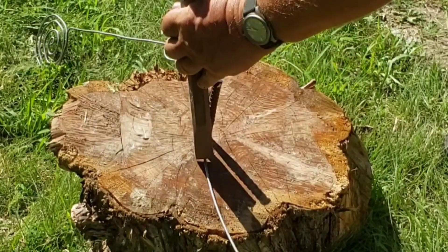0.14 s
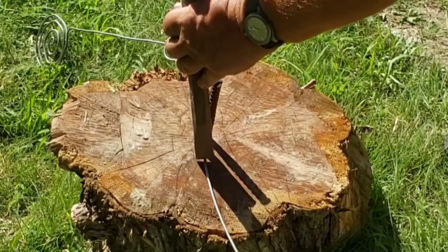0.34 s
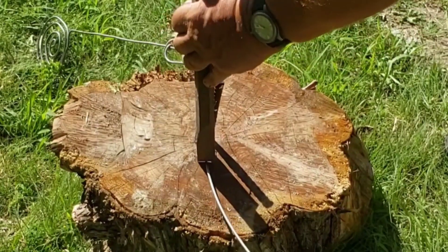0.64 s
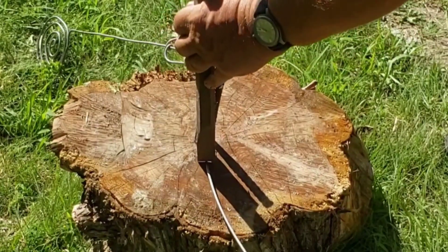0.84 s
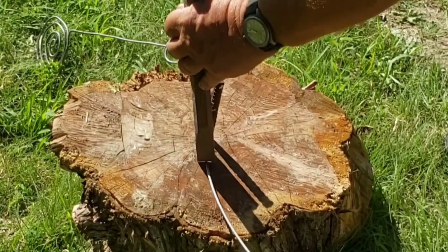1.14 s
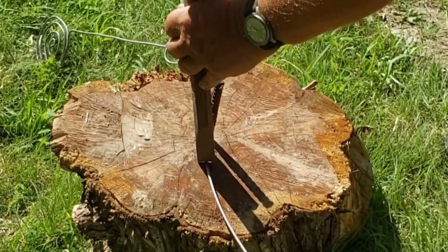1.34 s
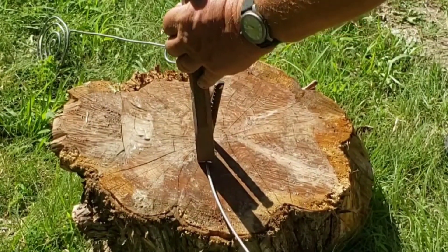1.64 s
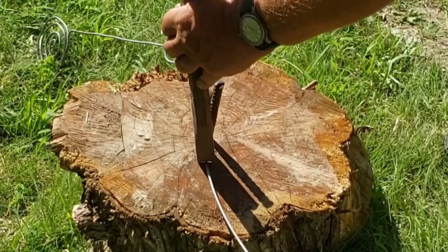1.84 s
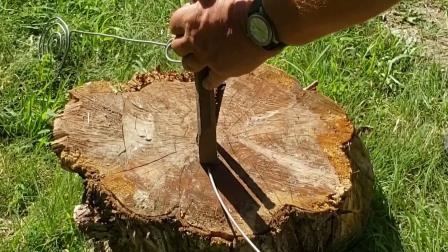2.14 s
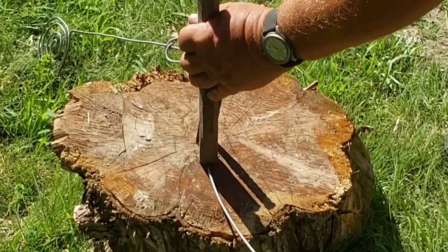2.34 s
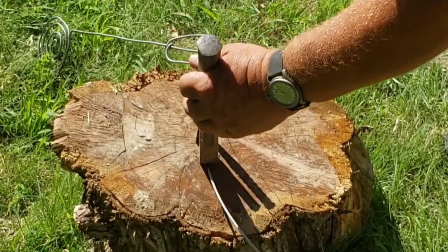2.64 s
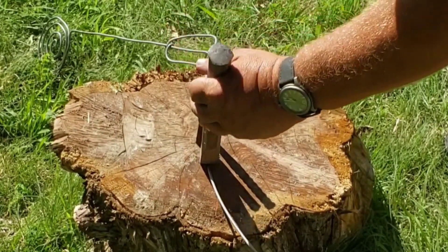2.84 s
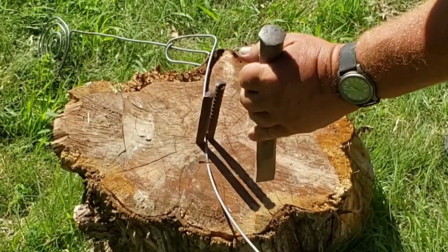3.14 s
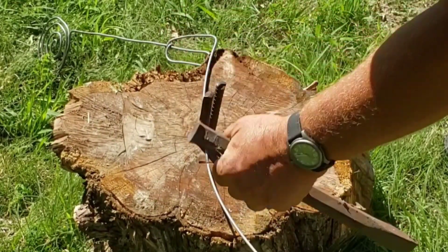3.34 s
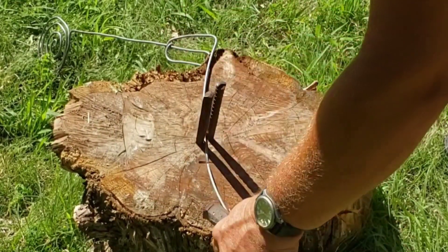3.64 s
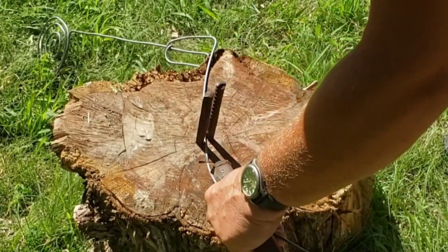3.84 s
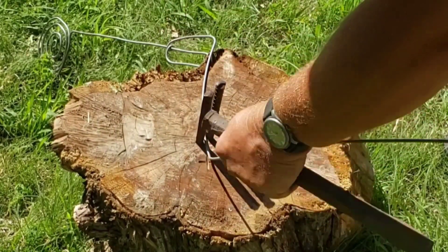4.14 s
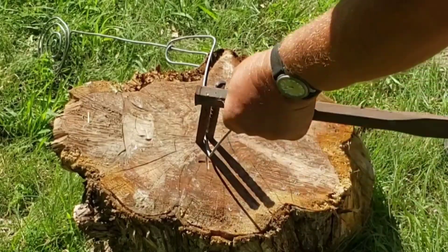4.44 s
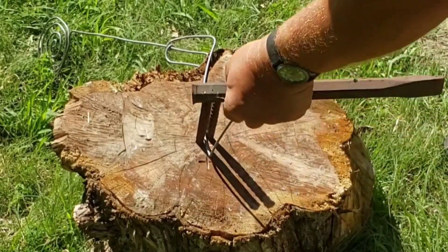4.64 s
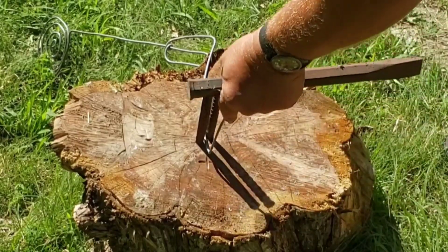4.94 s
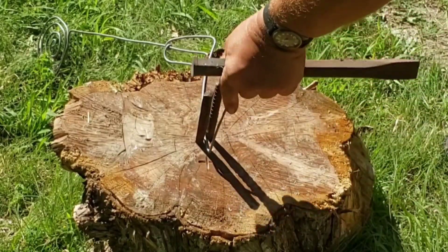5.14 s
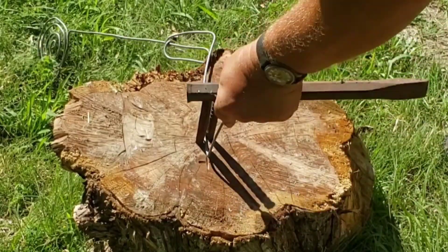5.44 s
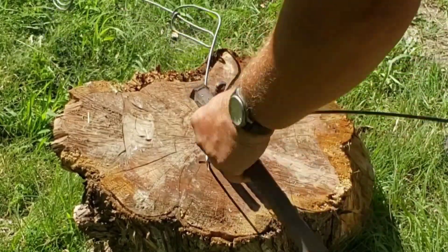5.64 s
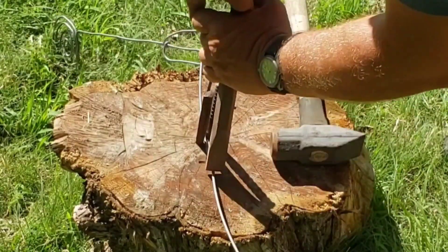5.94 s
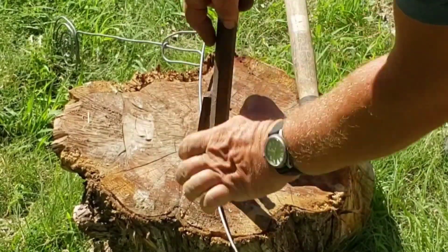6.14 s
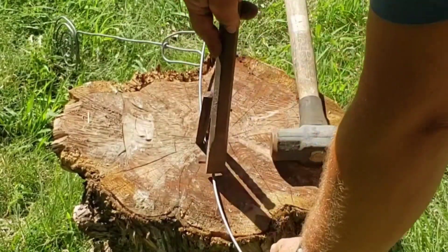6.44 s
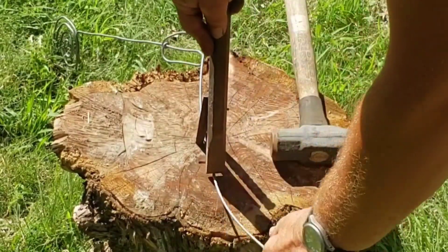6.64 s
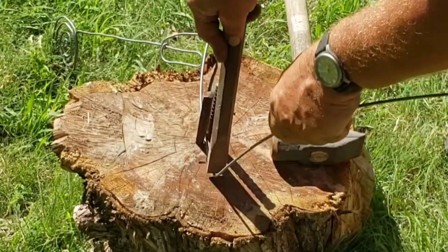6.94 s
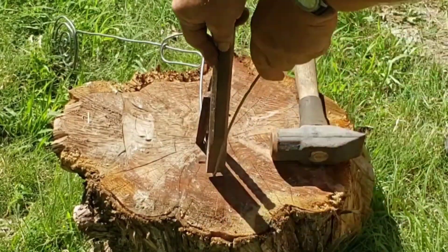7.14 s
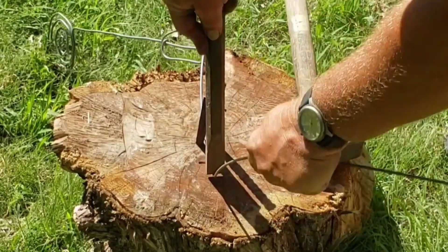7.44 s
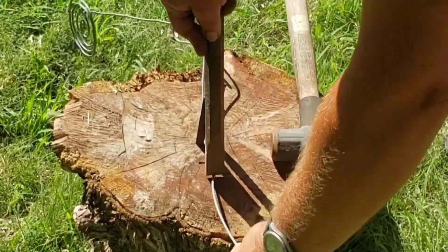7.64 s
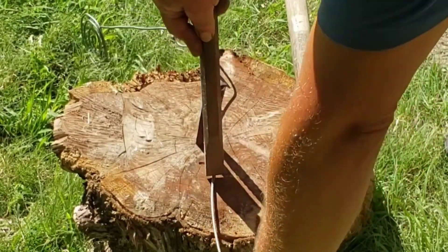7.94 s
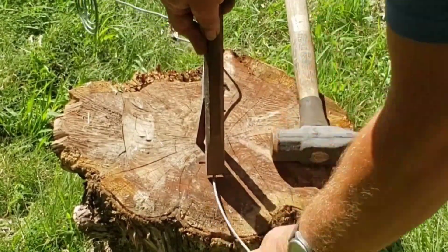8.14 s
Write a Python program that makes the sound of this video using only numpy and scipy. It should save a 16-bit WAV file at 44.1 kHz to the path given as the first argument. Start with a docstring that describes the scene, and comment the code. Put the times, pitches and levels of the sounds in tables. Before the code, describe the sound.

Three hard hammer blows on a cold chisel over a wooden stump, then small metal clinks, wire ticks and rattles, with growing wind buffeting outdoors.

```python
"""Low wind rumble and a faint hiss of leaves come first, then three blows of a hammer on a cold chisel,
cutting steel wire on a tree stump in a garden: noise bursts crack, decaying modes ring and thud.
The chisel is lifted and clinks in the hand; the notched wire is bent to and fro, ticks, and slips with
a rattle, as light contacts, gritty scrapes and short dull thuds. Shaped noise makes the rising breeze in
the leaves and the turbulence at the microphone, where single eddies add quick pressure swings."""
import sys
import numpy as np
from scipy import signal
from scipy.fft import rfft, irfft, next_fast_len
from scipy.io import wavfile
from scipy.ndimage import uniform_filter1d

SR = 44100
rng = np.random.default_rng(int(sys.argv[2]) if len(sys.argv) > 2 else 0)


def store_pcm(level_fs):
    """Save levels as 16-bit WAV."""
    pcm = np.round(np.clip(level_fs, -1, 1) * 32767).astype(np.int16)
    wavfile.write(sys.argv[1], SR, np.atleast_2d(pcm).T)


N = 365588
TIME = np.arange(N) / SR

# In every spectrum the levels are relative: the noise made from it is scaled to rms 1.
# wind on the microphone, before its chance lumps: time_s, level_db
WIND = [(0.0, -47), (0.64, -37.5), (1.06, -48), (1.6, -47.5), (2.1, -36.5), (2.28, -50.2), (2.68, -45.5),
        (2.92, -33), (3.2, -47), (3.8, -47.5), (4.08, -38.5), (4.21, -49.5), (4.45, -32.5), (5.74, -45),
        (5.8, -26.5), (6.73, -29.5), (8.23, -31.5), (8.29, -45.5)]
# buffets, single strong eddies: centre_s, pitch_hz, swing_db, wake_db
BUFFETS = [(0.332, 76, -29, -32.5), (0.77, 101, -25.5, -35), (2.204, 100, -27, -37),
           (2.377, 71.4, -28.5, -34.5), (4.515, 75, -18.5, -44), (5.008, 60.6, -20, -33),
           (5.22, 54.7, -17, -38), (5.796, 113, -13.5, -25.5), (5.875, 92, -11, -39),
           (6.018, 167, -22, -50), (6.142, 65, -18.5, -26.5), (6.751, 93, -4.5, -27.5),
           (6.841, 109, -21, -23.5), (7.251, 87.4, -16, -28), (7.44, 167, -9.5, -24.5),
           (7.532, 91, -15.5, -26), (7.652, 149, -15.5, -19.5), (7.719, 76, -14, -19),
           (8.016, 87, -10.5, -21.5), (8.15, 80, -8.5, -24)]
# spectrum of moving air at the microphone: frequency_hz, density_db_per_hz
RUMBLE = [(12, -37), (22, -14.5), (48, 7.5), (80, 4), (135, -9), (220, -30.5), (400, -51), (800, -91.5)]
# spectrum of small eddies at the microphone: frequency_hz, density_db_per_hz
FLUTTER = [(60, -24.5), (130, 7.5), (200, -1), (300, -11.5), (450, -22.5), (900, -61.5), (3000, -110)]
# breeze in the leaves: time_s, level_db
BREEZE = [(0.0, -61.5), (0.6, -57.5), (0.92, -64), (2.03, -60), (2.38, -64), (4.41, -57), (4.62, -53.5),
          (5.06, -50.5), (6.12, -53), (7.32, -51.5), (7.69, -49), (8.29, -49.5)]
# spectrum of the dull body of the leaves: frequency_hz, density_db_per_hz
LEAVES_BODY = [(120, -6.5), (300, 3), (550, 1), (1000, -2.5), (1500, -3.5), (2200, -12), (3200, -20),
               (6000, -53)]
# spectrum of the hiss of the leaves: frequency_hz, density_db_per_hz
LEAVES_HISS = [(1200, -23.5), (2200, -1), (3200, 0), (4500, -6), (7000, -10), (9500, -15.5), (11500, -29),
               (16000, -33)]
# hammer blows: start_s, crack_db, stump_db, stump_pitch_ratio, stump_ring_ratio, chisel_glancing_db,
# chisel_square_db, wire_db, scatter_db, treble_db, air_puff_db
BLOWS = [(0.4568, -5, -3, 0.6, 0.55, -17, -22.5, -26, -15, 1.5, -23.5),
         (1.3751, -6, 3.5, 0.7, 0.56, -46.5, -17.5, -10, -20, -1.5, -39),
         (1.9535, -2.5, 2.5, 1.05, 0.85, -40.5, -4.5, -21.5, -14.5, -2.5, -23.5)]
# spectrum of steel cracking on steel: frequency_hz, density_db_per_hz
CRACK = [(100, -12.5), (300, 3.5), (600, 7.5), (790, -10.5), (1100, -9), (1400, -1), (2000, -9),
         (2500, -10.5), (3500, -4), (5000, -15), (8500, -14.5), (11000, -29.5), (16000, -24.5)]
# spectrum of a blow scattered by the garden: frequency_hz, density_db_per_hz
SCATTER = [(100, -9), (300, 3.5), (600, 2.5), (820, 0.5), (1100, -2), (1400, -1.5), (2000, -8.5),
           (2600, -4.5), (3900, -5), (5000, -10), (6400, -8), (9000, -8.5), (11000, -12), (16000, -17.5)]
# dying of the sound scattered by the garden: frequency_hz, t60_s
GARDEN_T60 = [(100, 0.44), (500, 0.22), (1500, 0.24), (4000, .27), (9000, 0.23), (16000, 0.23)]
# stump modes, before the pitch and ring ratios: frequency_hz, level_db, t60_s
STUMP = [(300, -26.5, 0.058), (423, -8, .022), (561, 7, .024), (790, -12, 0.021)]
# the stump rocking on the soil, before its ring ratio: frequency_hz, level_db, t60_s
GROUND = [(75.04, -20.5, .5), (109, -31.5, 0.32)]
# the chisel in the fist, bending under a glancing blow: frequency_hz, level_db, t60_s
CHISEL_BENDING = [(1402, -25, .42), (3368, -1, .31), (3445, -6, .16), (3878, -12, .12), (6290, -17, .28),
                  (6875, -17, .12)]
# the chisel under a square blow, ringing lengthwise and bending faintly: frequency_hz, level_db, t60_s
CHISEL_LENGTHWISE = [(9075, 0, .05), (9040, -8, .05), (9060, -23, .24), (1402, -38, .55), (3878, -37, .26),
                     (6400, -36, .33)]
# the wire pinched under the edge: frequency_hz, level_db, t60_s
PINCHED_WIRE = [(875, -9.5, 0.049), (1420, -5, 0.033), (2520, 0.5, 0.028)]
# echoes from things nearby: delay_s, level_db
ECHOES = [(.0095, -22), (.021, -22)]
# spectrum of a landing crumb: frequency_hz, density_db_per_hz
CRUMB = [(1500, -23.5), (4000, -4.5), (8000, -1.5), (12000, -9.5), (16000, -18)]
# light touches of chisel and wire: start_s, tick_db, tick_top_hz, wood_knock_db, chisel_ring_db,
# wire_ring_db, ring_length_ratio, rebound_db (on top of the softer contact)
TOUCHES = [(0.853, -60, 14900, -69, -77, -79, .3, -18.5), (2.617, -79.5, 1500, -61, -76, -78, 0.99, -25),
           (2.981, -72, 2200, -40, -48.5, -78, 1, -4), (3.599, -51.5, 15000, -71, -66, -77, 0.26, -22),
           (3.671, -41.5, 15000, -42.5, -49, -51, 0.31, 0),
           (3.829, -44, 15000, -59, -43.5, -54, 0.38, -5.5), (3.978, -48, 9000, -35, -69.5, -45, 0.27, -10),
           (4, -45, 15000, -46, -70, -53, 0.43, -8), (4.446, -50, 8000, -47, -72.5, -56, 0.37, -20),
           (5.527, -40.5, 11600, -41, -70, -43, 0.25, -20),
           (5.610, -39.5, 6300, -33, -65.5, -42.5, 0.28, -9),
           (7.113, -42.5, 10100, -40, -70, -51, 0.23, -22),
           (7.286, -49.5, 7940, -67, -89.5, -60, 0.36, -20), (7.570, -38.5, 3500, -35, -62, -52, .2, -20),
           (7.635, -36.5, 4000, -41, -66.5, -57, .3, -20),
           (7.659, -24.5, 7250, -44, -61, -23.5, 0.43, -11.5),
           (7.669, -34, 12000, -41, -54, -37, 0.66, -22), (7.736, -40, 14000, -54, -65, -36, 0.59, -31),
           (7.782, -45, 9900, -54, -72, -62, .7, -20)]
# spectrum of a light tick of steel: frequency_hz, density_db_per_hz
TICK = [(200, -1), (1000, -2), (3000, 5), (5000, -1), (8000, 1.5), (11000, -3.5), (16000, -2.5)]
# spectrum of a light knock on wood: frequency_hz, density_db_per_hz
KNOCK = [(120, -26), (250, 2.5), (450, 7), (800, -1), (1350, -2.5), (2200, -21), (5000, -69)]
# the chisel held loosely, before the touch's ratios: frequency_hz, level_db, t60_s
LOOSE_CHISEL = [(1235, -7.5, .5), (3171, 0, .27), (5700, -16, .09), (9640, -20, .13), (10550, -22, .15)]
# the long wire, before the touch's ratios: frequency_hz, level_db, t60_s
WIRE = [(1315, -4, .19), (2440, -1, .11), (2760, -1, .13), (3790, -6, .12), (4750, -13, .08),
        (6200, -12, .09), (6950, -11, .09), (7810, -13, .13), (8500, -14, .09)]
# gritty scrapes of steel, and short dull thuds in the wood: centre_s, half_width_s, grit_db, wood_db
SCRAPES_AND_THUDS = [(0.913, 0.023, -51.5, -77), (2.618, 0.009, -80, -48), (3.687, 0.023, -49, -64),
                     (3.845, 0.015, -51, -75), (4.018, 0.024, -51, -55.5), (7.633, 0.0087, -62.5, -28.5),
                     (7.681, 0.023, -50, -27.5), (7.744, 0.014, -37, -41)]

RUMBLE_DB = 0  # turbulence relative to the wind level
LUMPY_DB, LUMPS_PER_S = 3.8, 7  # rms and corner rate of the chance lumps in the wind
GUST_DB = -28  # wind level of a full gust
FLUTTER_DB, FLUTTER_GROWTH = -41, 1.8  # flutter in a full gust, and its dB per dB of wind
EDDY_CYCLES, WAKE_S = 0.28, 0.029  # width of the swing, and of the rumble round it
LEAVES_BODY_DB, LEAVES_HISS_DB = .5, -6  # relative to the breeze level
CRACK_FOOT_HZ = 290  # high-pass corner of the crack, for a stump pitch ratio of 1
# the steel falls back once: a softer contact and a freer, longer ring
REBOUND_S, REBOUND_RING, REBOUND_SOFTER_DB = 0.029, 1.2, -14
CUTOFF_HZ = 15700


def from_db(db):
    """Level: a decibel value as an amplitude ratio."""
    return 10 ** (np.asarray(db) / 20)


def rms_one(x):
    """Normalisation: scale a signal to unit rms."""
    return x / np.sqrt(np.mean(x ** 2) + 1e-20)


def in_time(rows):
    """Interpolation: each column of a curve at every sample."""
    s, *columns = np.transpose(rows)
    return [np.interp(TIME, s, column) for column in columns]


def at_hz(points, hz):
    """Interpolation: read a curve on a log-frequency axis."""
    points_hz, values = np.array(points)[:, :2].T
    return np.interp(np.log(hz), np.log(points_hz), values)


def low_pass(x, hz, order=2):
    """Filtering: a Butterworth low-pass."""
    return signal.sosfilt(signal.butter(order, min(hz, .45 * SR), fs=SR, output="sos"), x)


def add(out, s, sound):
    """Superposition: mix a sound in at time s."""
    i = max(round(s * SR), 0)
    out[i:i + len(sound)] += sound[:max(N - i, 0)]


def noise(spectrum, size):
    """Spectral shaping: random noise of a given colour, rms 1."""
    padded = next_fast_len(size)
    hz = np.maximum(np.fft.rfftfreq(padded, 1 / SR), 1)
    coloured = rfft(rng.standard_normal(padded)) * from_db(at_hz(spectrum, hz))
    return rms_one(irfft(coloured, padded)[:size])


def dying(t60):
    """Damping: one second of exponential decay, 60 dB down after t60."""
    return np.exp(-np.log(1000) * TIME[:SR] / t60)


def swell(rise_s):
    """Inertia: one second of a smooth onset."""
    return 1 - np.exp(-(TIME[:SR] / rise_s) ** 2)


def drift(rate):
    """Random fluctuation: slow chance, spread 1, low-passed at a corner rate per second."""
    step = 40  # one chance value per 40 samples
    pole = np.exp(-2 * np.pi * rate * step / SR)
    chance = rng.standard_normal(N // step + 2002)
    slow = signal.lfilter([1], [1, -2 * pole, pole * pole], chance)[2000:]
    return np.interp(np.arange(N) / step, np.arange(len(slow)), rms_one(slow))


def swing(s, hz, width):
    """Eddy passage: one quick swing of pressure centred on time s, its width in cycles."""
    out = np.zeros(N)
    near = slice(max(int(s * SR) - SR // 16, 0), int(s * SR) + SR // 16)
    cycles = (TIME[near] - s) * hz
    out[near] = np.cos(2 * np.pi * cycles) / np.cosh(cycles / width)
    return out


def wind():
    """Turbulence: lumpy flow noise at the microphone; a buffet is one swing inside a short rumble."""
    level_db = in_time(WIND)[0] + LUMPY_DB * drift(LUMPS_PER_S)
    wakes = sum(from_db(wake_db) * np.exp(-((TIME - s) / WAKE_S) ** 2) for s, _, _, wake_db in BUFFETS)
    strength = np.hypot(from_db(level_db), wakes)
    flow = noise(RUMBLE, N)
    # even out the noise's own level, so that strength alone sets the loudness
    flow = flow / np.sqrt(uniform_filter1d(flow ** 2, size=2200) + 1e-6)
    # faster air sheds smaller eddies: the upper flutter grows more steeply than the rumble
    growth = (strength / from_db(GUST_DB)) ** FLUTTER_GROWTH
    flutter = from_db(FLUTTER_DB) * growth * noise(FLUTTER, N)
    eddies = sum(from_db(db) * swing(s, hz, EDDY_CYCLES) for s, hz, db, _ in BUFFETS)
    return from_db(RUMBLE_DB) * strength * flow + flutter + eddies


def leaves():
    """Many small sources: the far, smooth rustle's dull body and hiss rise together with the breeze."""
    breeze_db, = in_time(BREEZE)
    body = from_db(breeze_db + LEAVES_BODY_DB) * noise(LEAVES_BODY, N)
    hiss = from_db(breeze_db + LEAVES_HISS_DB) * noise(LEAVES_HISS, N)
    return body + hiss


def ring(modes, pitch=1, length=1):
    """Modal vibration: a struck body rings freely in damped sines; a firm grip shortens them."""
    return sum(from_db(db) * dying(t60 * length) * np.sin(2 * np.pi * hz * pitch * TIME[:SR])
               for hz, db, t60 in modes)


def burst(spectrum, length_s):
    """Impact: a contact is a short, dense crackle, shaped noise under a falling bell curve."""
    return noise(spectrum, SR) * np.exp(-(TIME[:SR] / length_s) ** 2)


def scatter(spectrum, early_db, early_t60):
    """Diffuse scattering: ground and plants return an early part and a tail that dies band by band."""
    hz = np.fft.rfftfreq(SR, 1 / SR)
    whole = rfft(noise(spectrum, SR))
    edges = np.geomspace(40, 20000, 9)
    early = from_db(early_db) * dying(early_t60)
    out = np.zeros(SR)
    for low, high in zip(edges, edges[1:]):
        band = irfft(whole * (hz >= low) * (hz < high), SR)
        tail = dying(at_hz(GARDEN_T60, np.sqrt(low * high)))
        out += band * (tail + early)
    return out / np.sqrt(2)


def wavering(sound, wet_db):
    """Interference: a ringing tone meets its own reflections, so that it beats and lingers."""
    paths = rng.standard_normal(SR) * dying(.13) * swell(0.0078)
    reflected = signal.fftconvolve(sound, paths / np.linalg.norm(paths))[:SR]
    return sound + from_db(wet_db) * reflected


def blows():
    """Impact excitation: steel cracks on steel, the chisel rings, the stump thuds and rocks on the soil."""
    out = np.zeros(N)
    for (s, crack_db, stump_db, pitch, length, glancing_db, square_db,
         wire_db, scatter_db, treble_db, puff_db) in BLOWS:
        # the crack of a lower-pitched blow keeps more bass
        foot = signal.butter(2, CRACK_FOOT_HZ * pitch ** 3, "high", fs=SR, output="sos")
        crack = from_db(crack_db) * signal.sosfilt(foot, burst(CRACK, length_s=0.0055))
        crack += from_db(scatter_db) * scatter(SCATTER, early_db=-5.0, early_t60=0.049) * swell(0.0029)
        # each blow has its own share of treble
        dull = low_pass(crack, 3000, order=1)
        add(out, s, dull + from_db(treble_db) * (crack - dull))
        # the heavy wood answers a few milliseconds after the steel
        thud = from_db(stump_db) * ring(STUMP, pitch, length) * swell(.0028)
        rocking = ring(GROUND, length=length ** .5) * swell(.012)
        add(out, s, thud + rocking)
        # the hammer pushes a puff of air past the microphone
        add(out, s + 0.015, from_db(puff_db) * burst(RUMBLE, length_s=.025) * swell(.004))
        chisel = from_db(glancing_db) * ring(CHISEL_BENDING)
        chisel += from_db(square_db) * ring(CHISEL_LENGTHWISE) * swell(0.0035)
        add(out, s, wavering(chisel, wet_db=-7.0) + from_db(wire_db) * ring(PINCHED_WIRE))
    return out


def echoes(x):
    """Reflection: things nearby return delayed, dull copies."""
    out = np.zeros(N)
    dull = low_pass(x, 2500)
    for delay, db in ECHOES:
        add(out, delay, from_db(db) * dull)
    return out


def crumbs(per_s, level_db, settle_s):
    """Random impacts: crumbs of bark and rust jump at each blow and patter back, ever more weakly."""
    out = np.zeros(N)
    for s, *_, treble_db, _ in BLOWS:
        landings = (rng.random(SR) < per_s / SR) * rng.standard_normal(SR) * dying(settle_s)
        patter = signal.fftconvolve(landings, burst(CRUMB, length_s=0.0048))[:SR]
        # the patter is louder after a blow with more treble
        add(out, s + 0.049, from_db(level_db + 3 * treble_db) * patter)
    return out


def contact(tick_db, top_hz, knock_db, chisel_db, wire_db, length):
    """Light impact: steel ticks, knocks on the wood and sets the loose chisel or the wire ringing."""
    tick = burst(TICK, length_s=0.004) + from_db(-9) * scatter(TICK, early_db=7.0, early_t60=0.059)
    knock = noise(KNOCK, SR) * dying(0.055) * swell(0.00056)
    # steel pressed hard enough to choke its ring is also stiffened, and rings a little higher
    pitch = 1 + .22 * max(.47 - length, 0)
    metal = from_db(chisel_db) * ring(LOOSE_CHISEL, pitch, length)
    metal += from_db(wire_db) * ring(WIRE, pitch, length)
    struck = from_db(tick_db) * low_pass(tick, top_hz) + from_db(knock_db) * knock
    return struck + wavering(low_pass(metal, 2 * top_hz), wet_db=-5.5)


def touches():
    """Restitution: each touch is a contact and one softer rebound."""
    out = np.zeros(N)
    for s, tick_db, top_hz, knock_db, chisel_db, wire_db, length, rebound_db in TOUCHES:
        add(out, s, contact(tick_db, top_hz, knock_db, chisel_db, wire_db, length))
        again = contact(tick_db + REBOUND_SOFTER_DB, top_hz, knock_db + REBOUND_SOFTER_DB,
                        chisel_db, wire_db, min(length * REBOUND_RING, 1))
        add(out, s + REBOUND_S, from_db(rebound_db) * again)
    return out


def scrapes_and_thuds(impulses_per_s):
    """Impulse trains: dense random impulses make gritty scrapes of steel and short dull thuds in the wood."""
    impulses = (rng.random(N) < impulses_per_s / SR) * rng.standard_normal(N)
    grit = rms_one(signal.fftconvolve(impulses, burst(TICK, length_s=0.0025))[:N])
    grit = low_pass(grit, 7200)
    wood = rms_one(signal.fftconvolve(impulses, ring(STUMP, pitch=0.68))[:N])
    out = np.zeros(N)
    for s, half_width, grit_db, wood_db in SCRAPES_AND_THUDS:
        envelope = np.exp(-((TIME - s) / half_width) ** 2)
        out += (from_db(grit_db) * grit + from_db(wood_db) * wood) * envelope
    return out


def scene():
    """Superposition: the work and its echoes, with the wind and the leaves."""
    work = blows() + crumbs(per_s=55, level_db=-50.5, settle_s=0.87)
    work += touches() + scrapes_and_thuds(impulses_per_s=830)
    return (wind() + leaves() + work + echoes(work))[None]


def record(dry):
    """Saturation and band limit: the blows overload the microphone; the top is cut."""
    ceiling = .95
    rounded = dry / (1 + (dry / ceiling) ** 4) ** .25
    top_cut = signal.ellip(10, .1, 80, CUTOFF_HZ, fs=SR, output="sos")
    return signal.sosfilt(top_cut, rounded)


dry = scene()
out = record(dry)
store_pcm(out)
```